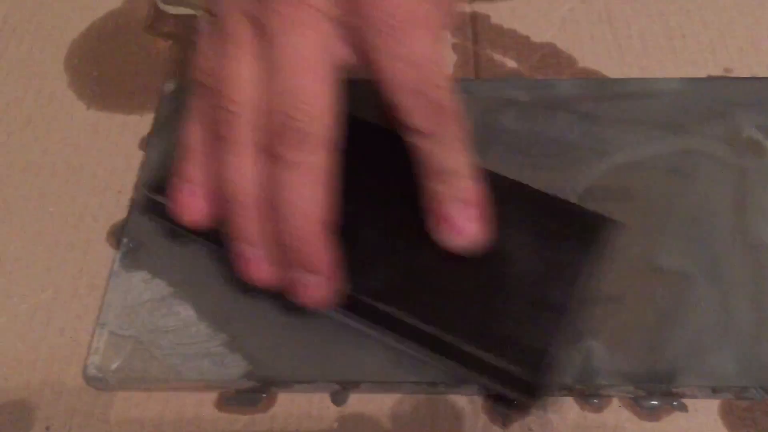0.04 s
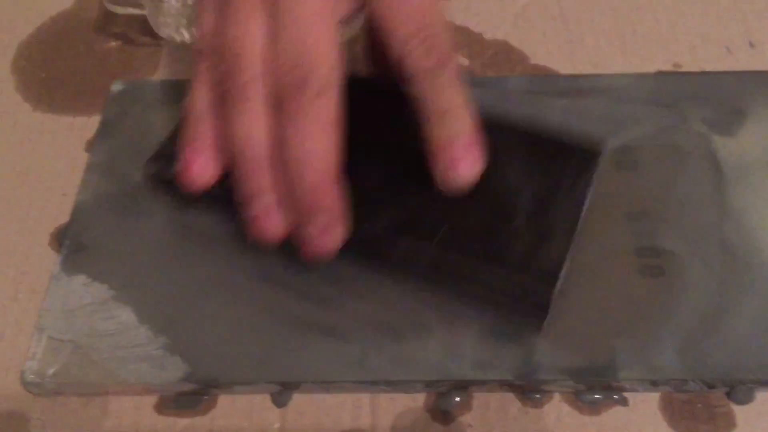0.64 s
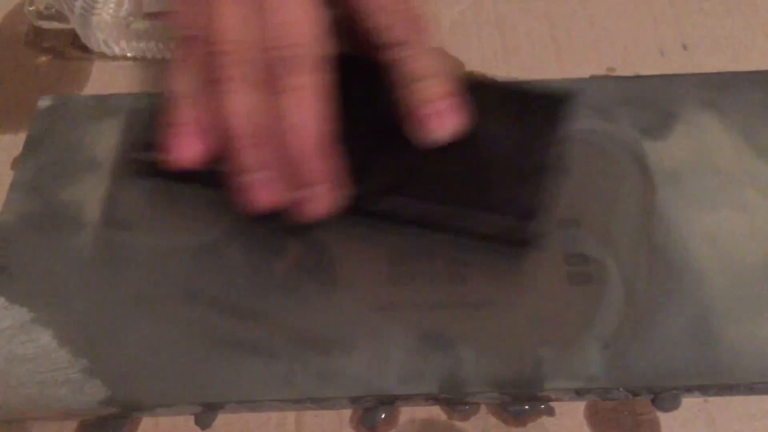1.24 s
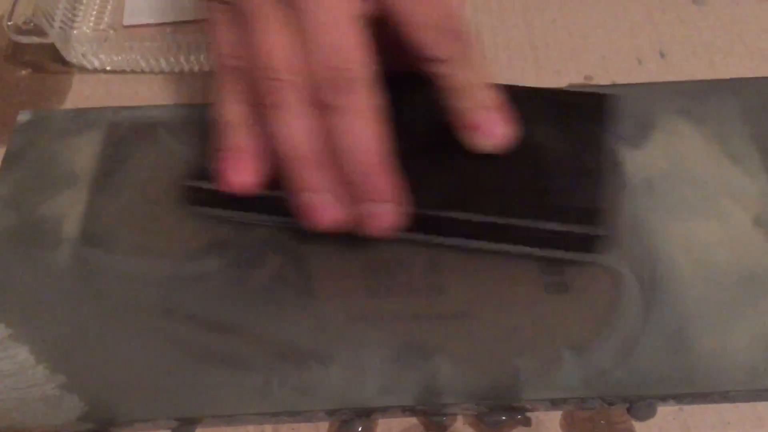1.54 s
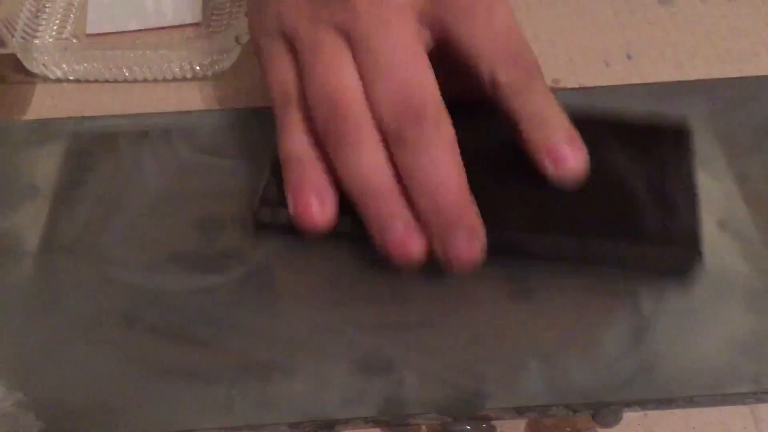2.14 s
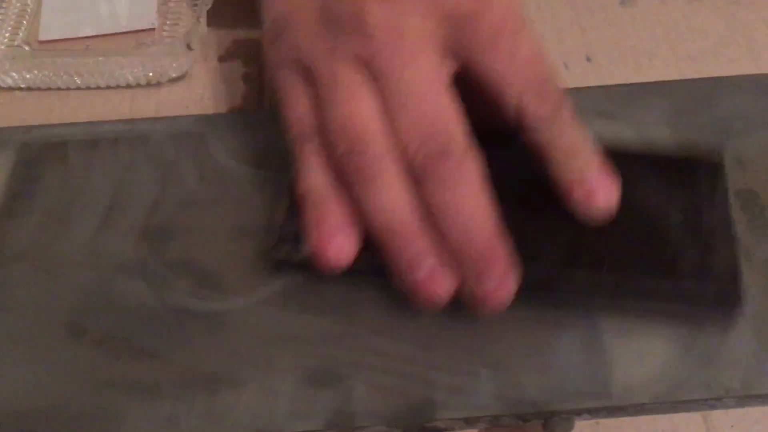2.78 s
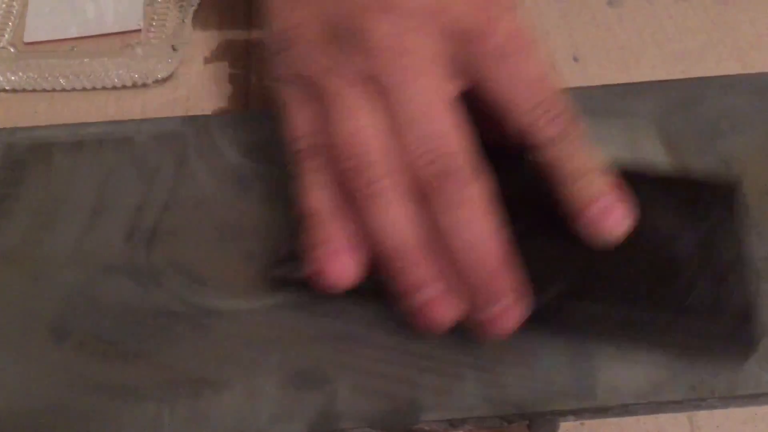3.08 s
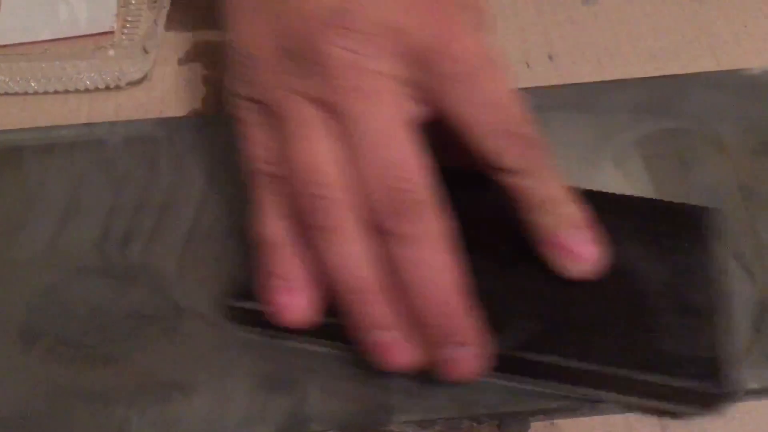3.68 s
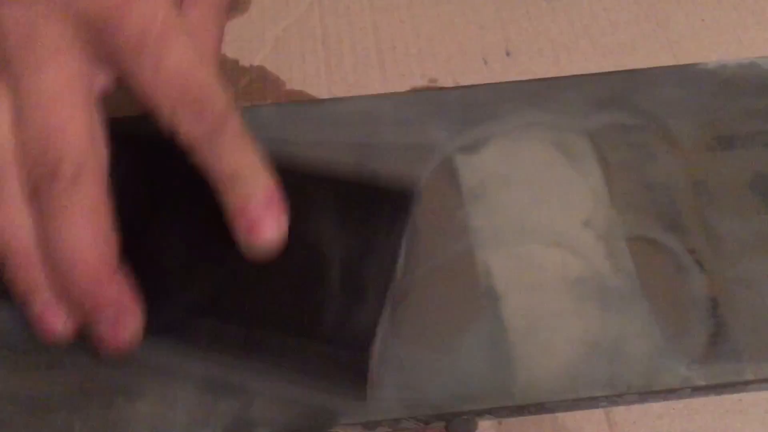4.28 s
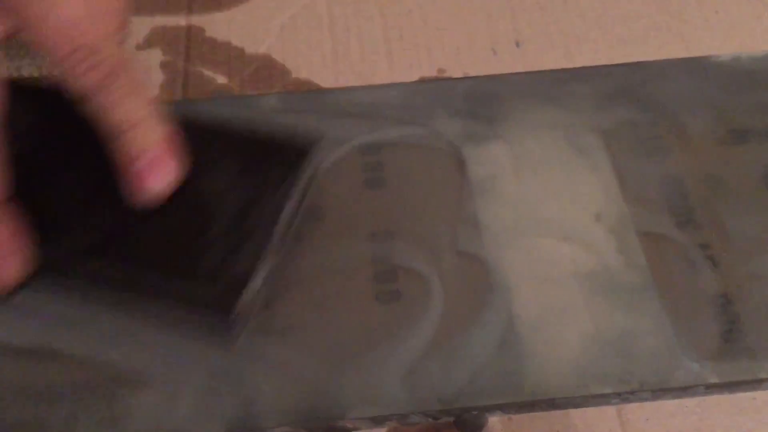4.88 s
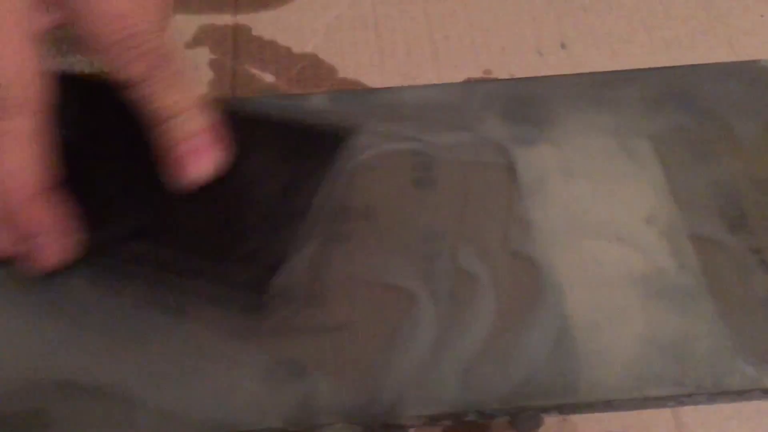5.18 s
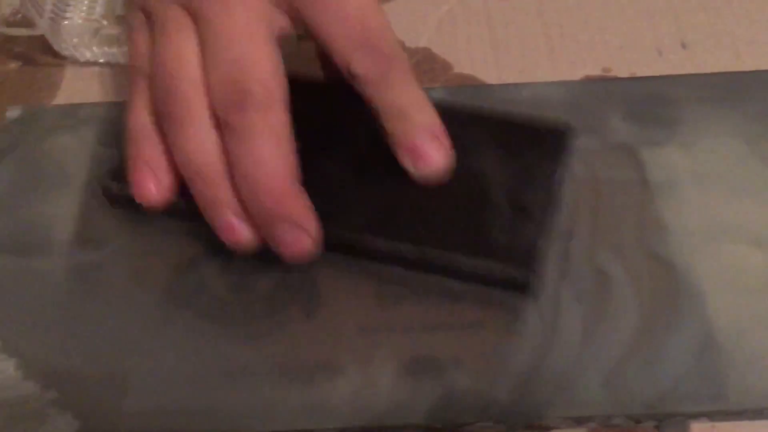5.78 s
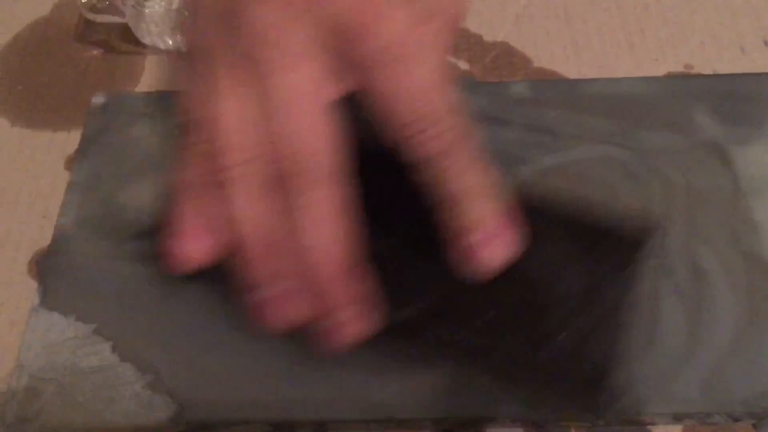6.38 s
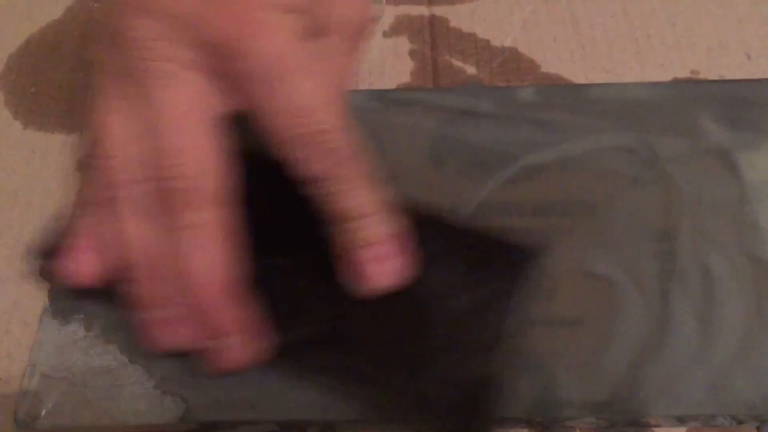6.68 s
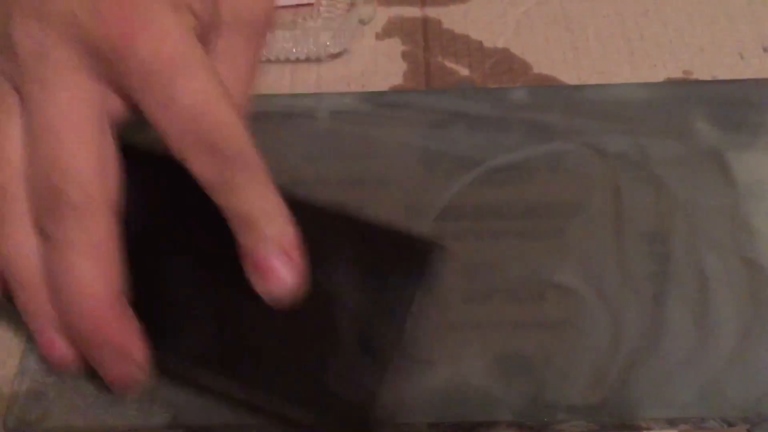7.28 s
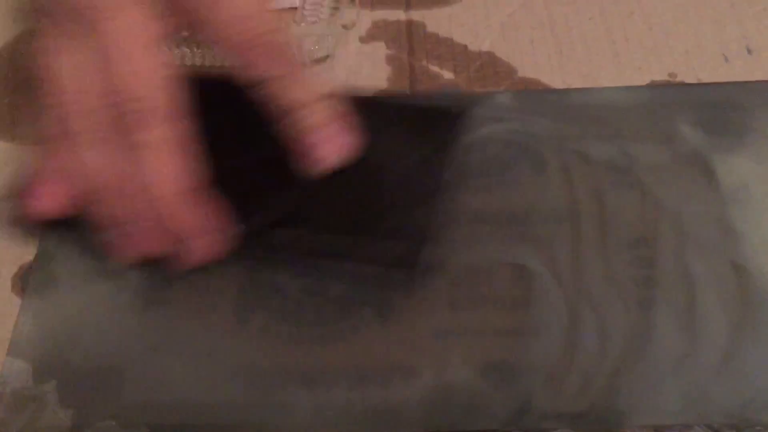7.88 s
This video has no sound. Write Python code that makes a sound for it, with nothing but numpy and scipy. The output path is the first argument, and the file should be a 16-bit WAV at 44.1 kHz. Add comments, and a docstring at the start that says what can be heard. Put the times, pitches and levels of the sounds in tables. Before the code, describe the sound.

A hard abrasive block is rubbed in loops over wet grit on a glass plate for the whole eight seconds, about three loops a second. Each push makes a coarse, grinding scrape, and a fine, high fizz fills the sweeps between. The glass rings thinly under the grit, so the tone swirls with each loop. From about 3 to 6 seconds the block's edge adds a high grating note. Large grains catch in brief crunches or gritty chirps near 0.5, 1.3 and 3.3 seconds, then more often between 4.7 and 6.8 seconds. From about 5 seconds the pushes become shorter and somewhat louder, strongest around 6 seconds, then ease slightly. The plate rocks on cardboard with a few very soft thuds, mostly after 6.4 seconds. A low, steady hum lies underneath. The microphone is close, in a small workshop with little echo.

```python
"""In a small workshop, a hard abrasive block is rubbed in loops, three a second, over wet grit on a
glass plate lying on cardboard. Countless grains crack under it and make the glass ring: coarse ones
grind on the push, fine ones fizz as the block sweeps on. Now and then a large grain catches, or the
plate rocks with a soft thud. A low hum fills the room; one close microphone hears it all."""
import sys
import numpy as np
from scipy import signal
from scipy.fft import rfft, irfft, next_fast_len
from scipy.io import wavfile
from scipy.ndimage import map_coordinates

SR = 44100
rng = np.random.default_rng(int(sys.argv[2]) if len(sys.argv) > 2 else 0)


def persist_wave(psi):
    """Save psi, clipped to +-1, as 16-bit WAV."""
    counts = np.round(np.clip(psi, -1, 1) * 32767).astype(np.int16)
    wavfile.write(sys.argv[1], SR, np.atleast_2d(counts).T)


N = 350154
TIME = np.arange(N) / SR

# The hand bears down once a loop. Each row: middle in seconds, relative level in dB, length in seconds.
PUSHES = [(0.168, -40.5, 0.07), (0.522, -43, 0.18), (0.83, -40.5, 0.12), (1.173, -41, 0.19),
          (1.489, -40.5, 0.24), (1.8, -38.5, 0.14), (2.107, -39, 0.19), (2.444, -38.5, 0.19),
          (2.775, -38, 0.17), (3.087, -40, 0.21), (3.424, -41.5, 0.26), (3.776, -41.6, 0.27),
          (4.118, -40, 0.11), (4.427, -40, 0.2), (4.713, -39, 0.2), (5.064, -37, 0.16),
          (5.421, -34.5, 0.11), (5.748, -36, 0.14), (6.09, -33, 0.072), (6.419, -34.5, 0.087),
          (6.767, -35.5, 0.086), (7.101, -36.5, 0.096), (7.437, -37.6, 0.084), (7.75, -39.5, 0.1)]


def amp(db):
    """Turns decibels into a number to multiply by."""
    return 10 ** (np.asarray(db) / 20)


def unit(x):
    """Scales a signal to an average power of 1."""
    return x / np.sqrt(np.mean(x ** 2) + 1e-20)


def value_at(points, hz):
    """Reads between rows of (Hz, value), along straight lines on a log-frequency axis."""
    f, value = np.transpose(points)
    return np.interp(np.log(hz + 1), np.log(f + 1), value)


def colour(x, spectrum):
    """Makes each frequency louder or softer, following rows of (Hz, dB)."""
    size = next_fast_len(len(x))
    gain = amp(value_at(spectrum, np.fft.rfftfreq(size, 1 / SR)))
    return irfft(rfft(x, size) * gain, size)[:len(x)]


def wander(per_s):
    """A random drift of size 1 that heads for a new value per_s times a second."""
    targets = rng.standard_normal(4096)
    return unit(np.interp(TIME * per_s, np.arange(len(targets)), targets))


def ring(gain):
    """The ringing after one tap on something with this gain at each frequency (minimum phase)."""
    log_gain = np.log(np.concatenate([gain, gain[-2:0:-1]]))
    spectrum = np.exp(np.conj(signal.hilbert(log_gain)))
    return np.fft.ifft(spectrum).real[:len(gain)]


def loops(s, loop_s=.33):
    """How many loops the hand has made by time s; a whole number at each push."""
    middles = np.transpose(PUSHES)[0]
    times = np.r_[middles[0] - loop_s, middles, middles[-1] + loop_s]
    return np.interp(s, times, np.arange(len(times)))


def effort(moves, shape, rest_db):
    """Each hand movement swells above a resting level; shape 1 is pointed, 2 is round."""
    middle, db, length = np.transpose(moves)[:, :, None]
    t = np.linspace(0, N / SR, 2000)
    distance = abs(2 * (t - middle) / length)  # 1 where the swell has half its power
    swells = amp(db) ** 2 * .5 ** np.minimum(distance ** shape, 100)
    return np.interp(TIME, t, np.sqrt(amp(rest_db) ** 2 + swells.sum(0)))


def hum_and_air():
    """A low, nearly steady hum over the faint noise of the room's air."""
    # The tones of the hum. Each row: pitch in Hz, relative level in dB.
    tones = [(49.2, -46), (98.6, -72), (148, -80)]
    # The noise of the air. Each row: frequency in Hz, relative level in dB.
    air = [(10, 9), (30, -15), (60, -1), (100, -6), (160, -13), (300, -6), (500, -11.5), (2000, -21.5),
           (16000, -28)]
    clock = np.cumsum(1 + .002 * wander(3)) / SR  # lets the pitch drift a little
    hum = sum(amp(db) * np.sqrt(2) * np.sin(2 * np.pi * (hz * clock + rng.random())) for hz, db in tones)
    return amp(-3.5) * hum + amp(-63.5) * unit(colour(rng.standard_normal(N), air))


def workshop_echo(x):
    """The bench and walls add a faint, short wash of echoes."""
    # How long echoes last. Each row: frequency in Hz, seconds to fade by 60 dB.
    fade_times = [(200, .3), (2000, .3), (6000, .25), (15000, .18)]
    hz, t, noise = signal.stft(rng.standard_normal(SR // 3), SR, nperseg=256)
    fade = amp(-60 * t / value_at(fade_times, hz)[:, None])
    tail = signal.istft(noise * fade, SR, nperseg=256)[1]
    return x + amp(-13) * signal.oaconvolve(x, tail / np.linalg.norm(tail))[:N]


def thuds(rise_s=0.0107):
    """The plate rocks on the cardboard: a low swing that dies quickly."""
    # Each row: peak time in seconds, relative level in dB, pitch in Hz.
    rocks = [(.29, -60, 105), (2.16, -62, 105), (2.53, -61, 152), (6.47, -57, 243), (7.24, -59.5, 195),
             (7.44, -58, 115), (7.77, -55, 95)]
    out = np.zeros(N)
    for s, db, hz in rocks:
        age = np.maximum(TIME - s + rise_s, 0)
        swell = age / rise_s * np.exp(1 - age / rise_s)
        out += amp(db) * swell * np.sin(2 * np.pi * hz * age)
    return out


def catches():
    """A large grain catches and crumbles in a short burst with a pitch of its own."""
    # Each row: middle in seconds, length in seconds, relative level in dB, pitch in Hz, spread in Hz.
    large_grains = [(.55, 0.041, -32, 7440, 900), (1.333, 0.065, -33.5, 6130, 300),
                    (3.346, .04, -31, 12800, 500), (4.672, 0.09, -34.5, 4570, 250),
                    (4.661, .07, -28.5, 7700, 2500), (5.329, .09, -34, 3660, 90),
                    (5.808, 0.036, -31, 4800, 150), (5.8, 0.06, -40, 8000, 2500),
                    (6.285, .04, -27.5, 1680, 600), (6.2905, 0.00515, -22.5, 1450, 760),
                    (5.2, 0.074, -29, 8100, 3900), (6.79, 0.096, -30, 8700, 1800)]
    force = np.zeros(N)
    for s, length, db, hz, width in large_grains:
        noise = rng.standard_normal(8192)
        f = np.fft.rfftfreq(len(noise), 1 / SR)
        band = 1 / (1 + ((f - hz) / width) ** 2) ** 2
        burst = irfft(rfft(noise) * band)[:int(length * SR)]
        part = force[int((s - length / 2) * SR):][:len(burst)]
        part += (amp(db) * unit(burst) * np.hanning(len(burst)))[:len(part)]
    return force


def grit(per_s, spread_db, clump_db, clumps_per_s):
    """Tiny cracks of uneven size, which come in clumps as the wet grit rolls under the block."""
    cracks = rng.standard_normal(N) * (rng.random(N) < per_s / SR)
    size_db = spread_db * np.minimum(rng.exponential(1, N), 5)
    return unit(cracks * amp(size_db + clump_db * wander(clumps_per_s)))


def rubbing(grinding, fizzing, drag_lag_s=0.0098):
    """The force under the block: drag, coarse grit, fine grit and the block's grating edge."""
    # The tone of each of the four contacts. Each row: frequency in Hz, relative level in dB.
    drag_tone = [(60, 35.5), (200, 40), (450, 38), (750, 37), (1100, 33.5), (1600, 18), (3000, -18)]
    coarse_tone = [(400, -12), (850, -1), (1200, 12.5), (3000, 13.5), (5500, 11), (7000, 6), (9000, 11.5),
                   (11000, -6), (16000, -17)]
    fine_tone = [(1000, -1), (3000, 4), (5500, 14), (6600, 17.5), (9000, 17.5), (11000, 20), (16000, 23)]
    edge_tone = [(4400, -20), (5000, 11), (5800, 5.5), (6400, -25)]
    # The edge grates more in the middle passes. Each row: time in seconds, relative level in dB.
    edge_levels = [(0, -3), (2.3, -22), (3.1, 4.5), (3.8, -1), (4.2, 7.5), (4.7, 4), (5.1, 3.5), (5.4, -3),
                   (5.8, 3), (6.2, -19), (7.94, -6)]
    drag = colour(grit(per_s=4000, spread_db=1.5, clump_db=1.5, clumps_per_s=58), drag_tone)
    coarse = colour(grit(per_s=24000, spread_db=1.3, clump_db=0.4, clumps_per_s=370), coarse_tone)
    fine = colour(grit(per_s=26000, spread_db=0.0, clump_db=-0.1, clumps_per_s=150), fine_tone)
    edge = colour(grit(per_s=14000, spread_db=-3.5, clump_db=1.0, clumps_per_s=60), edge_tone)
    # Under more weight the coarse grit bites harder and the fizz is smothered.
    pressure = grinding / grinding.mean()
    coarse_gain = amp(-0.04) * grinding.mean() * pressure ** 1.08
    fine_gain = amp(0.32) * fizzing / pressure ** 0.12
    edge_gain = coarse_gain * amp(np.interp(TIME, *np.transpose(edge_levels)))
    # The drag swells with the hand's weight once a loop, and more where the grit bites.
    push = np.cos(2 * np.pi * loops(TIME - drag_lag_s))
    drag_gain = amp(-63 + 3 * push) * pressure ** 0.57
    return drag_gain * drag + coarse_gain * coarse + fine_gain * fine + edge_gain * edge


def rim_echo(force, delay_s=0.001372, swing=0.075):
    """High waves bounce off the plate's rim; each push shortens their path, so the tone sweeps up."""
    late_s = delay_s * (1 - swing * np.sin(2 * np.pi * loops(TIME)))
    treble = colour(force, [(2000, -25), (3800, -20), (9000, -4), (14000, -4)])
    return force + amp(-10) * map_coordinates(treble, [(TIME - late_s) * SR], order=3)


def glass_plate(force, weight, give=0.97, bend=0.0061, hop=1800, size=4096, patch_count=50):
    """The glass rings at its own notes; the circling block bends and feeds them, so the sound swirls."""
    # The notes. Each row: pitch in Hz, rough width in Hz, gain in dB with the block at left, at right.
    notes = [(263, 56, -17.5, -21.5), (333, 36, -20, -18), (464, 49, -43, -16.5), (561.6, 23, -9, -26),
             (702, 160, -23.5, -22), (860, 39, -41, -15), (1074, 56, -15, -12.5), (1245, 44.5, -1.5, -13.5),
             (1453, 132, -9, -7), (1904, 140, -7, -5.5), (2200, 55, -9, -13), (2326, 118, -2, 0.5),
             (2540, 74, -4, -12.5), (2596, 33, -13, -29), (2840, 77, -4.5, -4.5), (3047, 49, -4, -6),
             (3240, 38, -7.5, 3), (3360, 79, 1.5, -14.5), (3540, 117, -7.5, -4.5), (3714, 76, 2, 1),
             (3970, 72, -6, -1), (4040, 68, 2, -6.5), (4506, 194, -3, -5.5), (4616, 60, 2, -4),
             (5120, 104, -4, -11), (5330, 41, -4.5, -3.5), (5650, 120, -11, -9.5), (5933, 184, -3.5, -3.5),
             (6374, 116, -3.5, -7.5), (6600, 200, -8, -18), (7760, 99, -10, -22), (8300, 33, -4.5, -8.5),
             (9660, 380, -12, -12.5), (11230, 860, -15.5, -14.5)]
    # The crowd of weaker notes between them. Each row: frequency in Hz, gain in dB.
    weak_notes = [(60, -21.5), (170, -34.5), (450, -33), (920, -30), (1300, -17.5), (2500, -13),
                  (4200, -10), (4880, -14.5), (6800, -8), (7500, -14.5), (9900, -15), (10400, -18),
                  (11000, -16), (12200, -16.5), (13300, -15.5), (15700, -21)]
    # Where the loops lie on the plate. Each row: time in seconds, place from 0 (left) to 1 (right).
    path = [(0, 0.3), (1.1, 0.44), (2, 0.66), (2.8, 0.69), (3.6, 0.75), (4.5, 0.79), (5.2, 0.066),
            (5.9, 0.31), (7.1, 0.031), (7.94, 0.21)]
    # A hard push near the left end lowers some notes. Each row: pitch in Hz, largest share of it lost.
    sag = [(1904, 0.0039), (2215, 0.038), (2317, 0.034), (2540, 0), (3712, 0.0035), (4050, 0.017),
           (4628, 0.029), (5107, 0.032), (5340, 0.0013)]
    f = np.fft.rfftfreq(size, 1 / SR)
    hz, width, left_db, right_db = np.transpose(notes)[:, :, None]
    nearest = rng.random(hz.shape)  # the point of the loop where the block loads each note most
    padded = np.pad(force, (hop, 2 * hop))
    out = np.zeros(N + 3 * hop + size)
    for start in range(0, N + hop, hop):  # each overlapping piece rings in its own way
        loop = loops(start / SR)
        place = np.interp(start / SR, *np.transpose(path))
        load = np.tanh(give * (1 - place) * weight[min(start, N - 1)])
        pitch = hz * (1 - bend * np.cos(2 * np.pi * (loop - nearest)) - load * value_at(sag, hz))
        flicker_db = rng.uniform(-5.76, 5.64, hz.shape)
        db = left_db + place * (right_db - left_db) + flicker_db
        peaks = amp(db) / (1 + ((f - pitch) / (0.8 * width)) ** 2)
        patches_db = 2 * np.interp(f, np.linspace(0, SR / 2, patch_count), rng.standard_normal(patch_count))
        crowd = amp(value_at(weak_notes, f) + patches_db)
        gain = np.sqrt((peaks ** 2).sum(0) + crowd ** 2)
        piece = padded[start:][:2 * hop] * np.hanning(2 * hop)
        rung = signal.fftconvolve(piece, ring(gain))
        out[start:][:len(rung)] += rung
    return out[hop:][:N]


def scene():
    """The hand drives the grit, the grit rings the glass, and one microphone feeds both channels."""
    # The block sweeps fast twice a loop, out and back, and the fine grit fizzes.
    # Each row: fastest moment in seconds, relative level in dB, length in seconds.
    sweeps = [(0.043, -45.5, 0.08), (0.23, -43.5, 0.087), (0.392, -46, 0.075), (0.553, -42.5, 0.1),
              (0.734, -44, 0.104), (0.899, -43, 0.11), (1.064, -45.5, 0.094), (1.229, -44, 0.11),
              (1.428, -46.2, 0.2), (1.547, -45, 0.082), (1.75, -46.1, 0.161), (1.889, -43.5, 0.078),
              (2.034, -42.8, 0.077), (2.19, -43, 0.12), (2.443, -44.5, 0.2), (2.56, -44.5, 0.063),
              (2.753, -44, 0.15), (2.888, -43.5, 0.071), (3.094, -44.5, 0.21), (3.2, -45, 0.074),
              (3.417, -44.5, 0.19), (3.537, -42.5, 0.054), (3.739, -44.5, 0.21), (3.873, -45, 0.08),
              (4.014, -43.5, 0.096), (4.208, -45, 0.095), (4.338, -41, 0.08), (4.514, -43, 0.079),
              (4.653, -43.5, 0.093), (4.835, -44.5, 0.093), (4.984, -44.4, 0.11), (5.155, -44.8, 0.059),
              (5.301, -46, 0.12), (5.502, -44.2, 0.06), (5.645, -46.8, 0.14), (5.815, -44, 0.089),
              (5.975, -44, 0.092), (6.157, -45, 0.098), (6.301, -41.5, 0.062), (6.492, -43, 0.12),
              (6.657, -44, 0.1), (6.825, -42.5, 0.086), (7.012, -45.5, 0.134), (7.163, -43, 0.098),
              (7.304, -45, 0.073), (7.481, -42.8, 0.1), (7.649, -46, 0.1), (7.832, -42.5, 0.081),
              (7.984, -41, 0.08)]
    resting_db, turning_db = -41.5, -51  # grinding under the block's own weight; fizz as it turns
    grinding = effort(PUSHES, shape=1.63, rest_db=resting_db)
    fizzing = effort(sweeps, shape=2.03, rest_db=turning_db)
    force = rim_echo(rubbing(grinding, fizzing)) + catches()
    glass = glass_plate(force, weight=grinding / amp(resting_db) - 1)
    sound = amp(-0.74) * workshop_echo(glass) + amp(2.5) * thuds() + hum_and_air()
    return np.array([sound, sound])


def record(dry):
    """A steep filter cuts off the very highest treble."""
    cutoff_hz = 15760
    low_pass = signal.firwin(1023, cutoff_hz, window=("kaiser", 9), fs=SR)
    return signal.oaconvolve(dry, low_pass[None], "same")


dry = scene()
out = record(dry)
persist_wave(out)
```